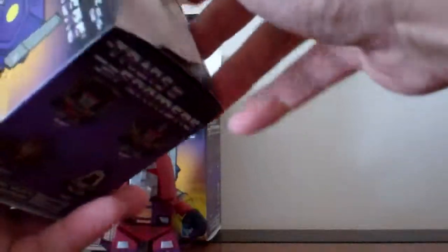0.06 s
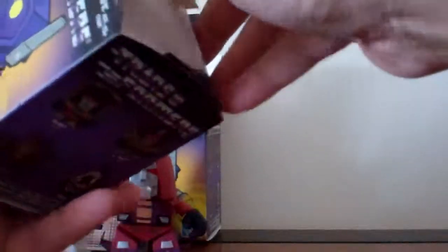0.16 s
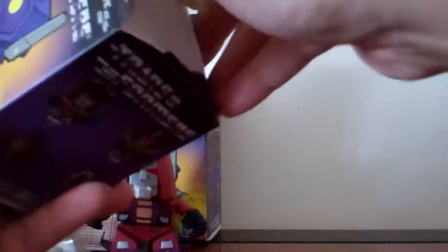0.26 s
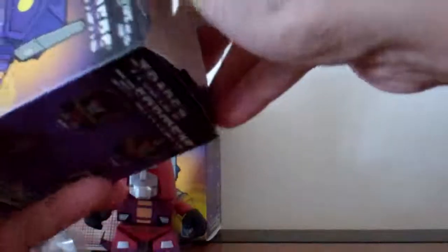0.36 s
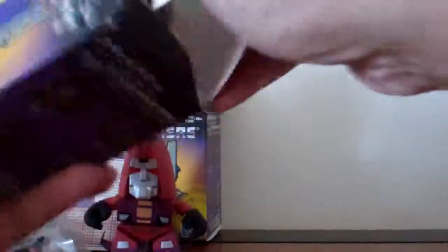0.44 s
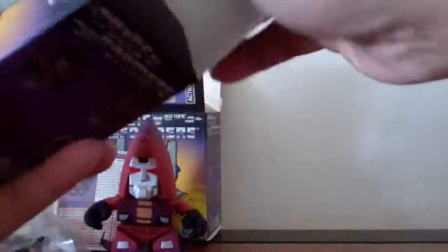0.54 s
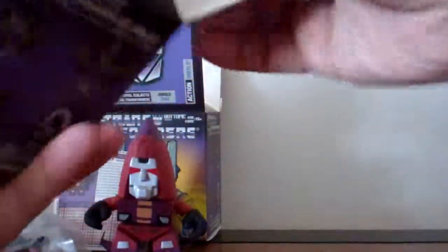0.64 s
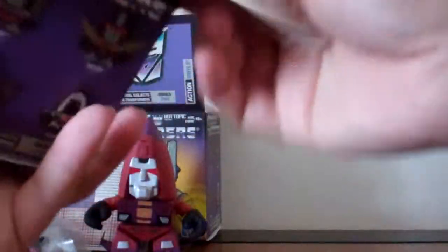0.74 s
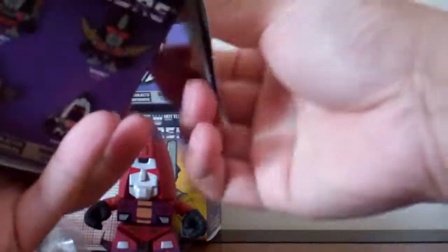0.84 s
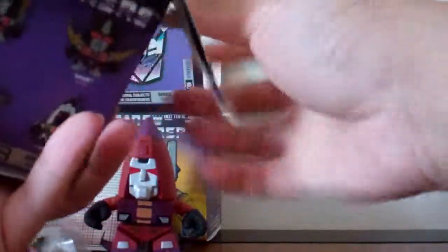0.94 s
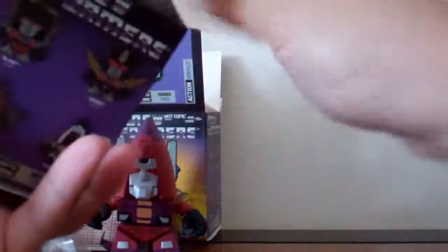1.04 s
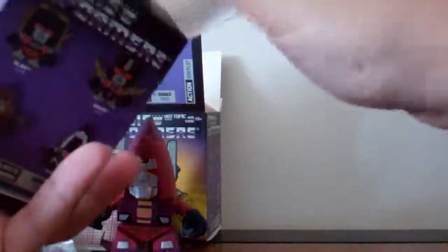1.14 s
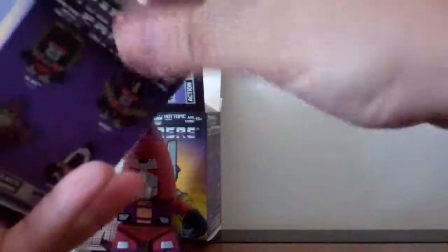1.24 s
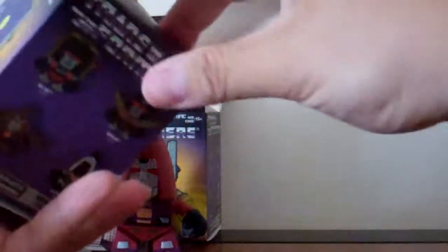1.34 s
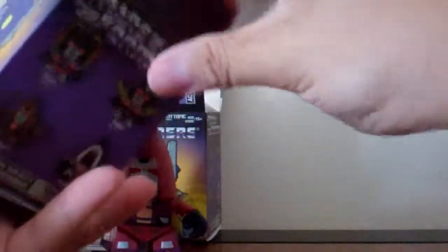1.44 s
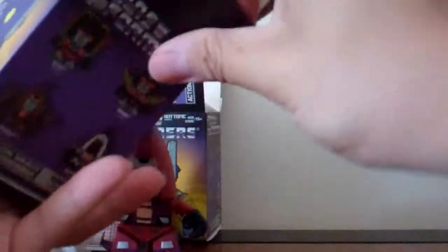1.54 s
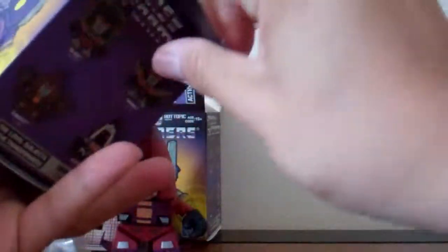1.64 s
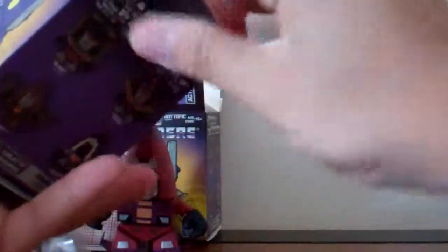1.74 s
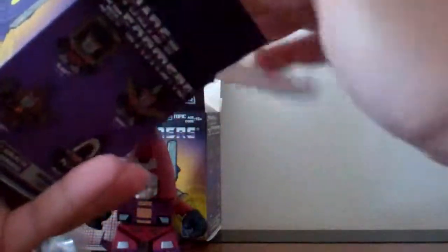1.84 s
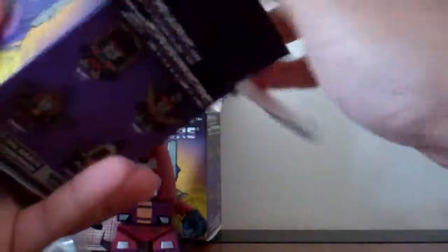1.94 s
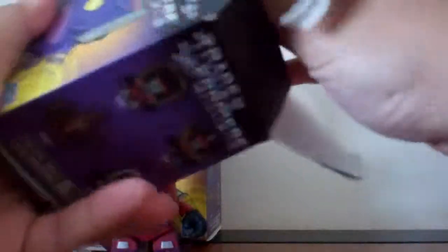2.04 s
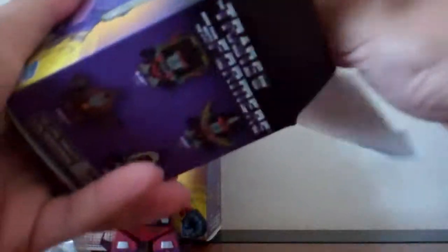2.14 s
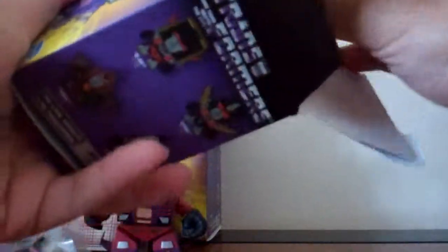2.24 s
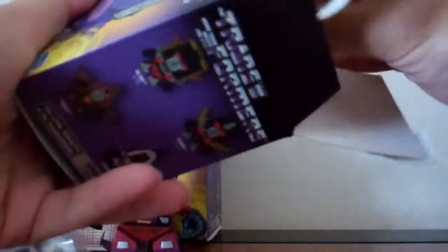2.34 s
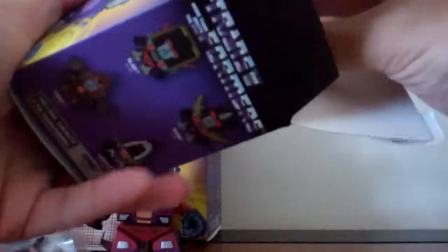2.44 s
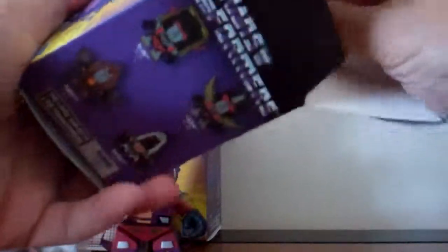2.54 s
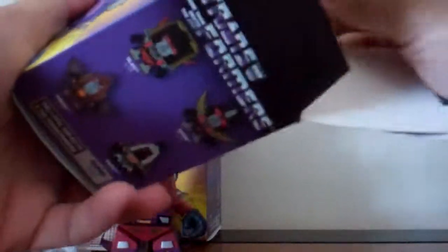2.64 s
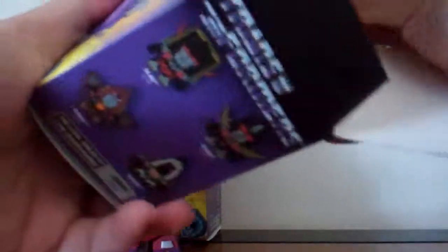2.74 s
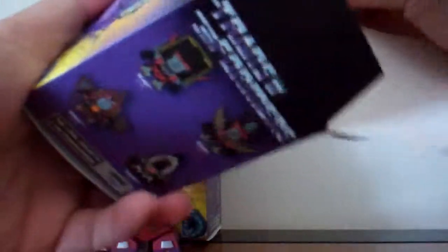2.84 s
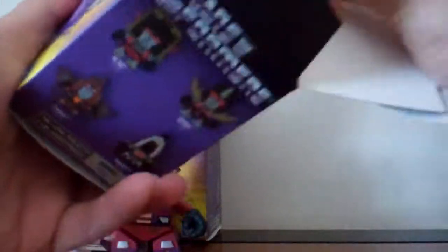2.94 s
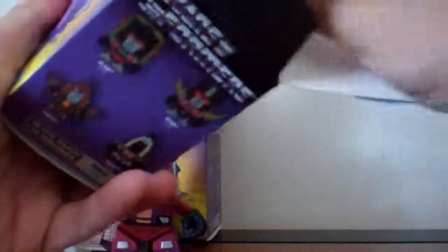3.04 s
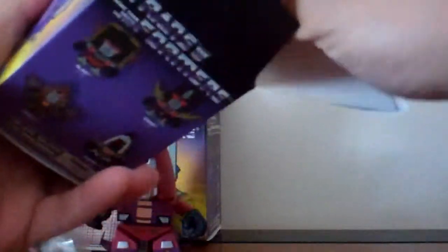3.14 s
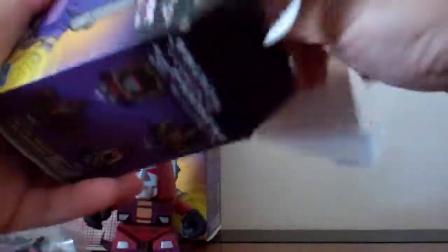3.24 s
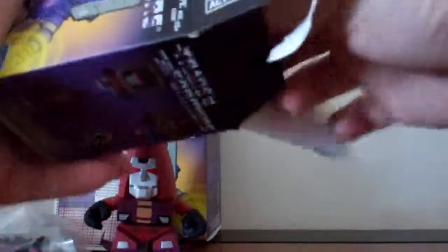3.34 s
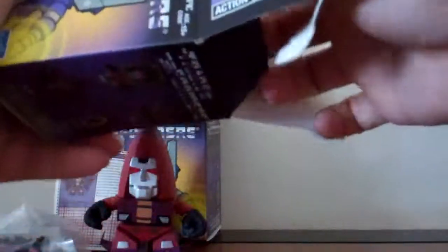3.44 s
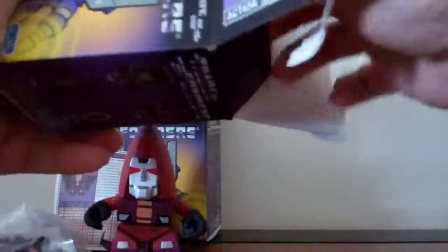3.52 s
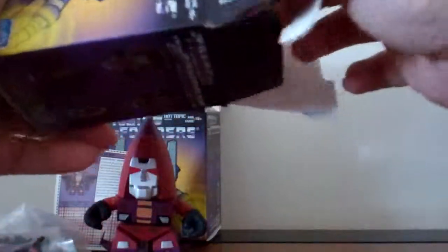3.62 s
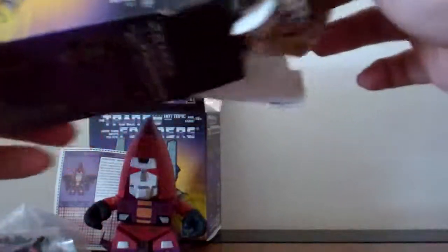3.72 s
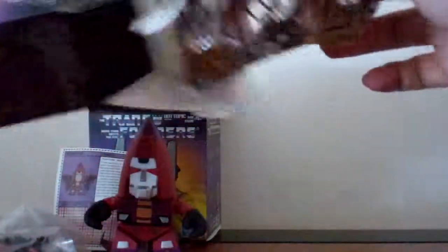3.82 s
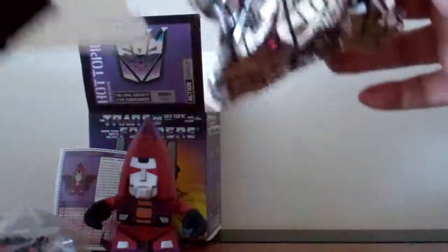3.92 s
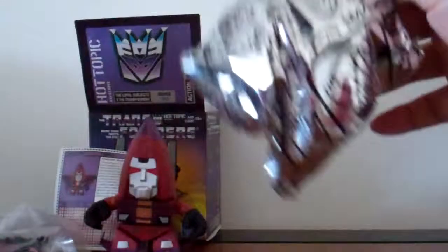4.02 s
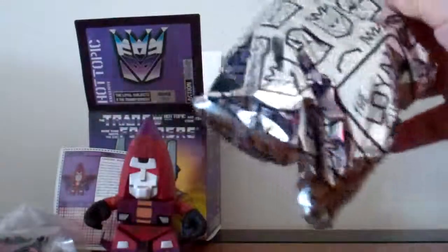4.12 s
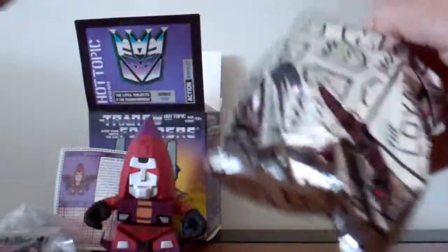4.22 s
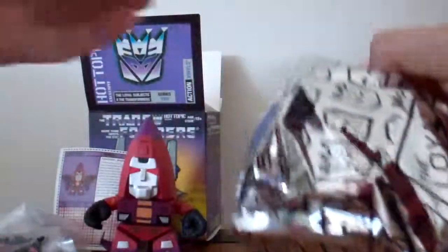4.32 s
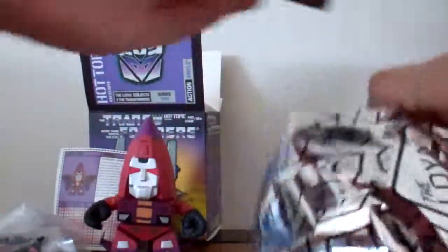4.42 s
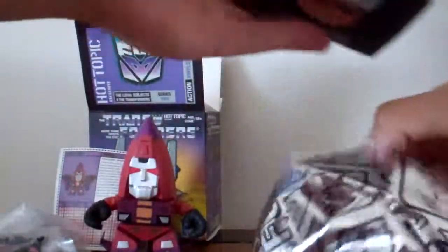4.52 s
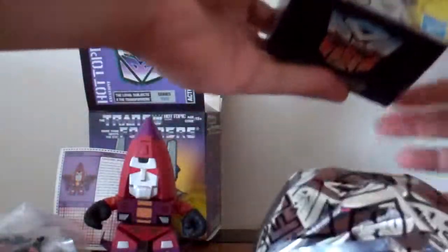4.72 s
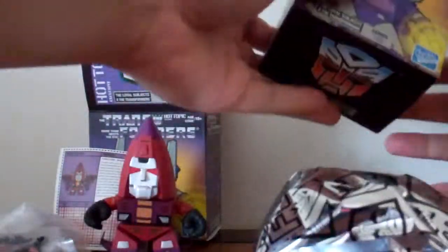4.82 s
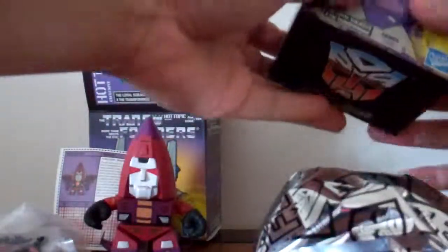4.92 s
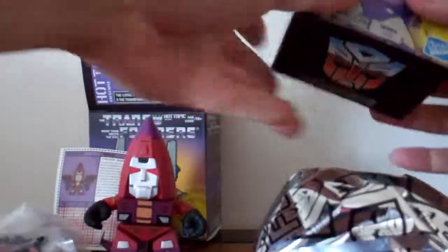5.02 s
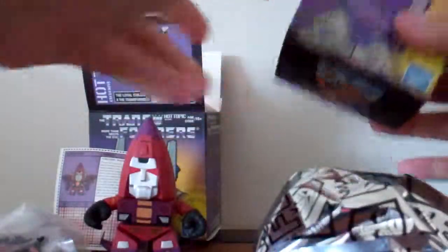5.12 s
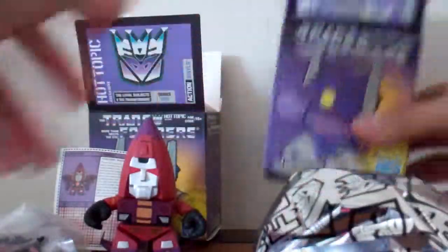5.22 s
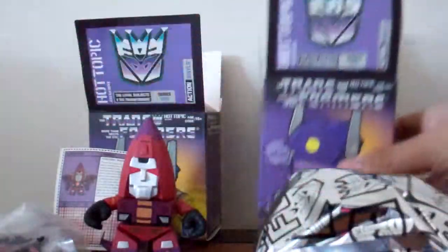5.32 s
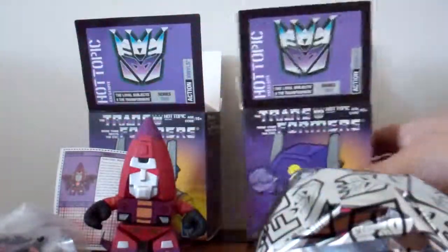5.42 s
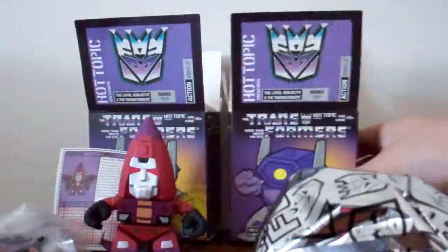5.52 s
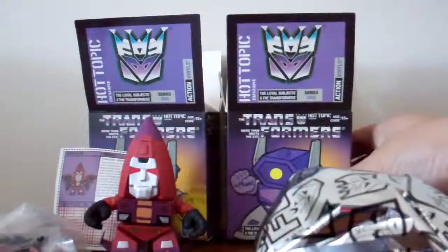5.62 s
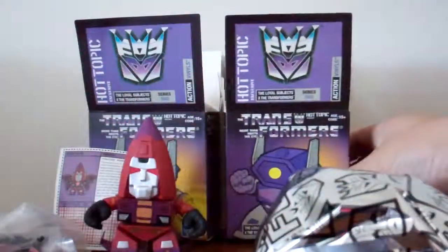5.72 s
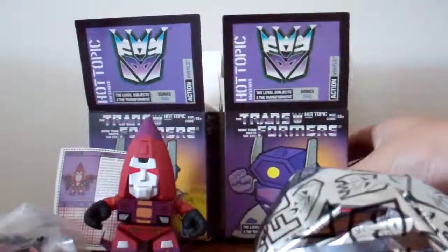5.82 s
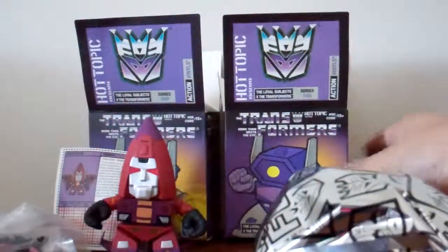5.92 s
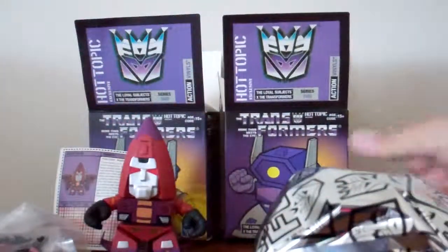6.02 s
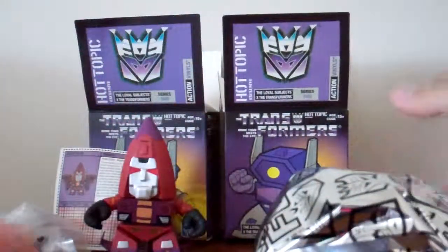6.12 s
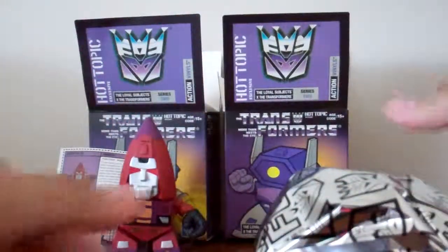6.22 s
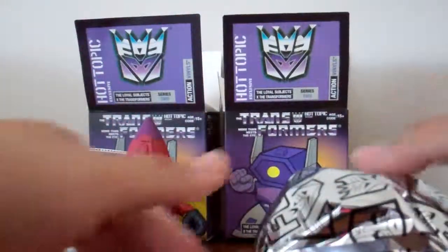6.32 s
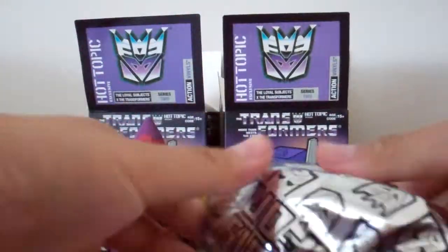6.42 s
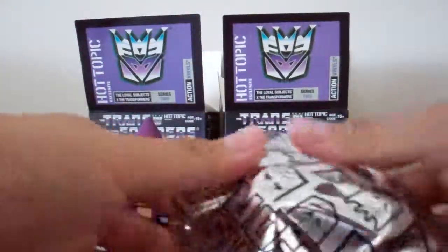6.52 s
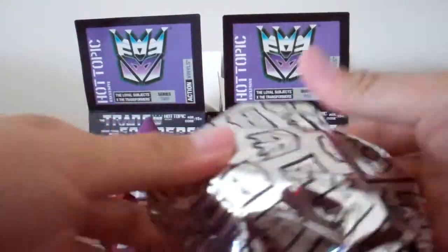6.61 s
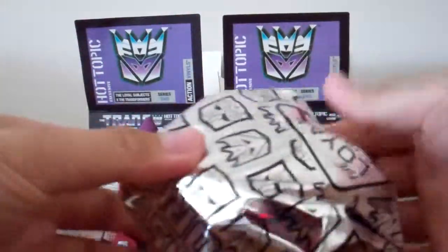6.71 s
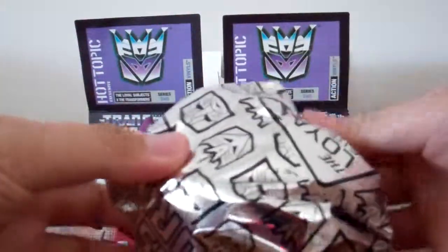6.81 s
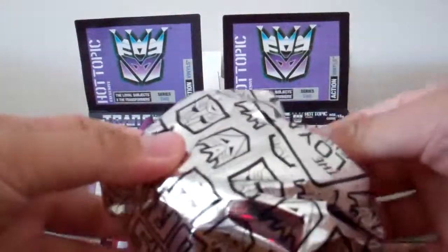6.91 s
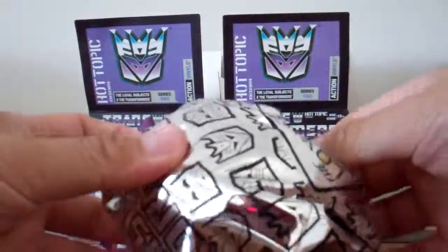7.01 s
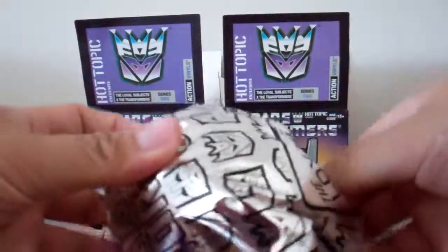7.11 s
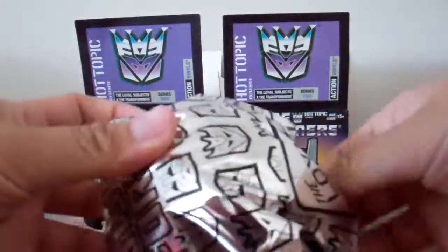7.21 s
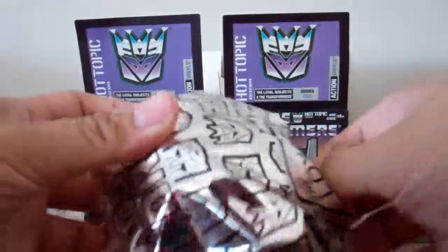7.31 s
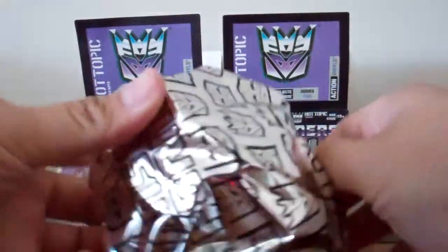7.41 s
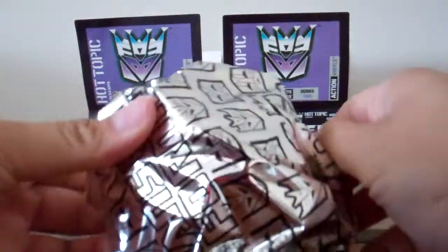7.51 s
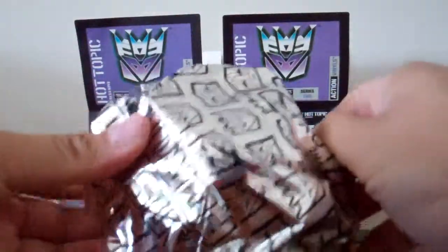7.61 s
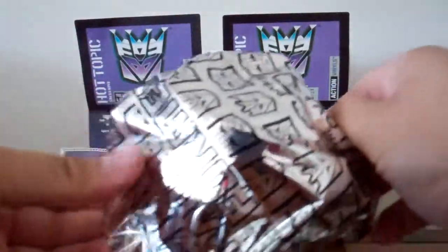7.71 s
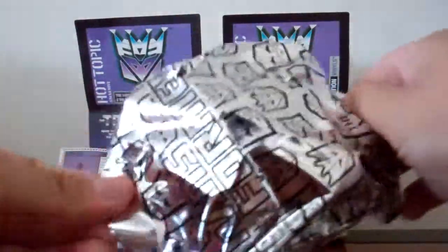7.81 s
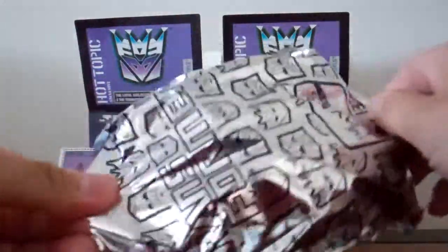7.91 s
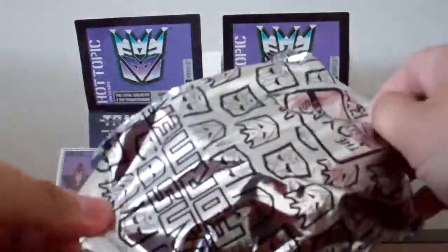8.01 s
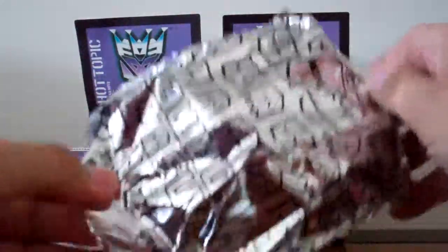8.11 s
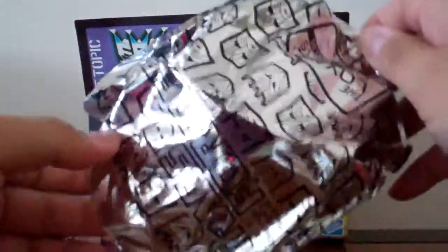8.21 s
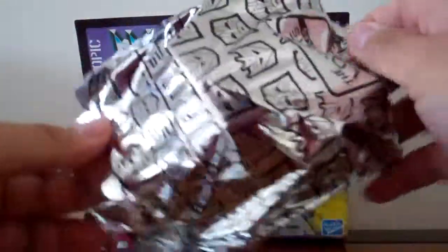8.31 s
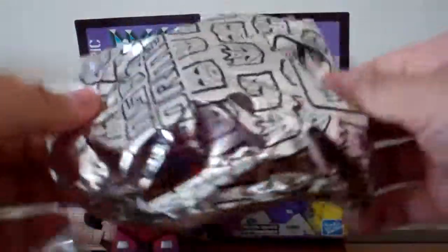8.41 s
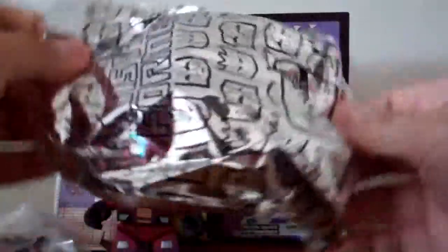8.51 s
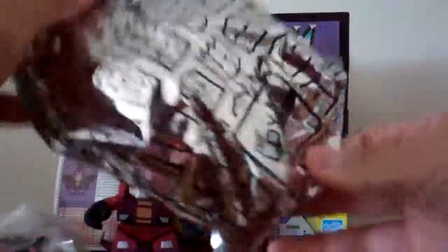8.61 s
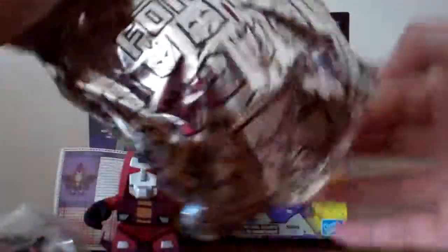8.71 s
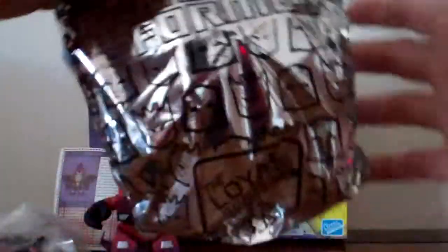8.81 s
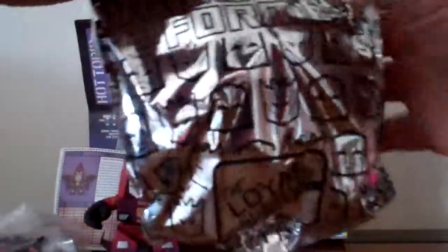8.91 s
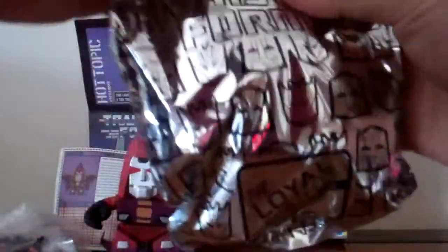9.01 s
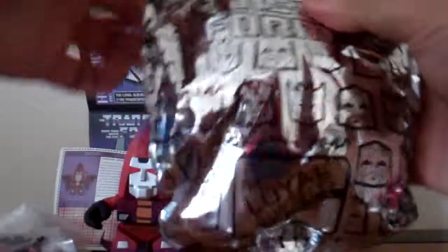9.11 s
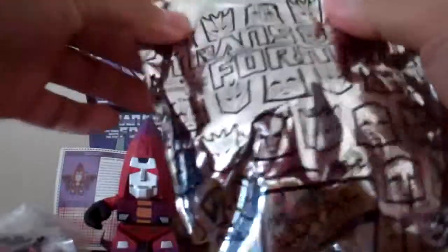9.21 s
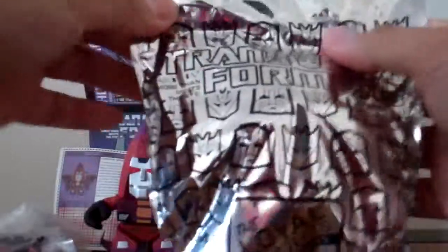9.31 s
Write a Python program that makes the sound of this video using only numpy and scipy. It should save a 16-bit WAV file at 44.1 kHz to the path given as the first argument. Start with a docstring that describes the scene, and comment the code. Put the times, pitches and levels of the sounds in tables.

```python
"""A cardboard box is opened by hand close by: sheet instability makes its flaps snap, friction makes it rasp.
A foil bag is pulled out, both are set down, then the bag is picked up, crumpled and tugged: its creases
buckle in sharp clicks over a finer crackle of small facets. Noise bursts model the slips, and decaying
sines the modes of sheets, box and soft bumps; shaped noise models gliding skin and desk scuffs.
A small room adds its echoes, diffuse tail and steady background noise."""
import sys
import numpy as np
from scipy import signal
from scipy.fft import rfft, irfft, next_fast_len
from scipy.io import wavfile
from scipy.ndimage import uniform_filter1d

SR = 44100
rng = np.random.default_rng(int(sys.argv[2]) if len(sys.argv) > 2 else 0)


def dump_mix(stems):
    """Bounce the given channels to the path in sys.argv[1] as a 16-bit WAV at rate SR."""
    frames = np.atleast_2d(stems).T  # one column per channel
    limited = np.clip(frames, -1, 1)  # hard clip at full scale
    pcm = np.round(limited * 32767).astype(np.int16)
    wavfile.write(sys.argv[1], SR, pcm)


N = 412335
TIME = np.arange(N) / SR
AGE = np.arange(4096) / SR  # time since the start of a short sound, s
BLOW_S = 0.005  # reference duration for the energy of a short sound
# a push builds up over a share of its length, holds, then dies away with this time constant
STROKE_ATTACK_SHARE, STROKE_RELEASE_S = 0.18, 0.014
SQUEEZE_ATTACK_SHARE, SQUEEZE_RELEASE_S = 0.082, 0.021
GLIDE_ATTACK_SHARE, GLIDE_RELEASE_S = 0.8, 0.05
# a patch takes this many cycles to decay by 60 dB, so patches of higher pitch die sooner
CARD_RING_CYCLES, FOIL_RING_CYCLES = 11, 10
# level of a patch's other modes beside its main one
CARD_OVERTONES_DB, FOIL_OVERTONES_DB = -4, -3
CREASE_SLIP_S = 0.0007  # time constant of a buckling crease


def undb(db):
    """Level to amplitude: 20 dB is a factor of ten."""
    return 10 ** (np.asarray(db) / 20)


def unit(x):
    """Power normalisation: scale to rms 1."""
    return x / np.sqrt(np.mean(x ** 2, axis=-1, keepdims=True))


def blow(x, db):
    """Energy normalisation: a short sound gets the energy of BLOW_S seconds at this level."""
    energy = np.sum(x ** 2, axis=-1, keepdims=True)
    return x * undb(db) * np.sqrt(BLOW_S * SR / energy)


def shaped(x, db_at):
    """Minimum-phase filtering: a folded cepstrum gives the causal filter of a given gain in dB."""
    size = 2 * next_fast_len(x.shape[-1])
    hz = np.maximum(np.fft.rfftfreq(size, 1 / SR), 1)
    cepstrum = irfft(np.log(undb(db_at(hz))))[..., :size // 2]
    cepstrum[..., 1:] *= 2
    response = np.exp(rfft(cepstrum, size))
    return irfft(rfft(x, size) * response)[..., :x.shape[-1]]


def colour(x, points, bright_db=0):
    """Spectral shaping: gain interpolated over log frequency, plus a treble shelf."""
    f, db = np.transpose(points)

    def db_at(hz):
        shelf_db = bright_db / (1 + (6500 / hz) ** 2)
        return np.interp(np.log(hz), np.log(f), db) + shelf_db

    return shaped(x, db_at)


def ring(hz, t60):
    """Damped free vibration: one struck mode, falling by 60 dB in t60 seconds."""
    return np.sin(2 * np.pi * hz * AGE) * np.exp(-np.log(1000) * AGE / t60)


def through(x, response):
    """Linear superposition: convolve a mid and side pair with an impulse response."""
    return signal.fftconvolve(x, np.atleast_2d(response), axes=-1)[:, :x.shape[-1]]


def add(track, s, sound):
    """Superposition in time: mix a short sound in at time s."""
    start = max(int(s * SR), 0)
    part = track[:, start:start + sound.shape[-1]]
    part += sound[..., :part.shape[-1]]


def curve(table):
    """Level contour: interpolate the dB columns, falling by 100 dB per second outside the table."""
    s, *columns = np.transpose(table)
    idle_s = np.maximum(s[0] - TIME, 0) + np.maximum(TIME - s[-1], 0)
    return [np.interp(TIME, s, column) - 100 * idle_s for column in columns]


def pushes(table, attack_share, release_s):
    """Incoherent summation: overlapping attack-hold-release pushes add in power, per dB column."""
    power = np.zeros((len(table[0]) - 2, N))
    for start, length, *db in table:
        t = TIME[:int((length + 10 * release_s) * SR)]
        attack = np.clip(t / (attack_share * length), 0, 1)
        release = np.exp(-np.maximum(t - length, 0) / release_s)
        add(power, start, np.outer(undb(db), attack * release) ** 2)
    return np.sqrt(power)


def patchy(rate, spread_db):
    """Random modulation: a gain of rms 1 that heads for a new level rate times a second."""
    steps = rng.standard_normal(N // 100)
    wander = np.interp(TIME * rate, np.arange(len(steps)), steps)
    return unit(undb(spread_db * wander))


def rippled(x, ripple_db, count):
    """Modal colouring: the same sound from count patches of sheet, each with its own peaks and dips."""
    phases = 2 * np.pi * rng.random((3, count, 1, 1))

    def db_at(hz):
        return ripple_db * sum(np.cos(k * np.log(hz) + p) for k, p in zip((2, 4.5, 9), phases))

    return shaped(x, db_at)


def drifting(versions, rate):
    """Power-normalised cross-fading: wander between versions, with new shares rate times a second."""
    moments = np.arange(0, TIME[-1], 1 / rate)
    shares = np.array([np.interp(TIME, moments, rng.exponential(size=len(moments)) ** 2) for _ in versions])
    mix = sum(share * unit(version) for share, version in zip(shares, versions))
    return mix / np.sqrt(np.sum(shares ** 2, axis=0) + 1e-9)


def slips(slip_s, ripple_db, count):
    """Stick-slip: noise bursts of micro-slips; long ones break into jerks under a millisecond apart."""
    age = AGE[:1024] / max(slip_s, 1e-4)
    envelope = np.sqrt(age) * np.exp(-age)
    jerks = undb(4.5 * np.repeat(rng.standard_normal((count, 1, 32)), 32, axis=-1))
    bursts = envelope * jerks * rng.standard_normal((count, 2, len(age)))
    return rippled(bursts, ripple_db, count)


def grains(kinds, rate, spread_db, smooth_share):
    """Granular friction: a swarm of slips, most weak and a few strong, over an even hiss."""
    swarm = np.zeros((2, N))
    # each of the N / 50 candidates sounds by chance, giving about rate slips a second
    for k, (when, chance, luck) in enumerate(rng.random((N // 50, 3))):
        if chance < rate * 50 / SR:
            gain = undb(-spread_db * np.log(luck + 0.076))
            add(swarm, when * N / SR, kinds[k % len(kinds)] * gain)
    # the hand feeds in energy evenly, however it is shared between slips
    power = np.abs(uniform_filter1d(np.mean(swarm ** 2, axis=0), size=3000))
    swarm /= np.sqrt(power + 1e-6)
    return swarm + np.sqrt(smooth_share) * rng.standard_normal((2, N))


def snap(spectrum, crack_db, bright_db, slip_s, hz, sheet_db, cycles, overtones_db):
    """Snap-through instability: a sheet jumps to a new shape with a crack, and the freed patch rings."""
    burst, = slips(slip_s, ripple_db=1.8, count=1)
    crack = blow(colour(burst, spectrum, bright_db), crack_db)
    # the outline of a patch is irregular: its other modes fall anywhere around the main one and die sooner
    overtones_hz = hz * 2 ** rng.uniform(-0.6, 1.2, 16)
    others = sum(rng.standard_normal() * ring(f, 0.5 * cycles / f) for f in overtones_hz)
    push = np.pad(burst, ((0, 0), (0, len(AGE))))
    main = unit(through(push, ring(hz, cycles / hz)))
    sheet = main + undb(overtones_db) * unit(through(push, others))
    # at low frequency, air just slips round the edge of the patch
    sheet = blow(colour(sheet, [(100, -18.0), (550, 3.0)]), sheet_db)
    add(sheet, 0, crack)
    return sheet


# spectrum of the room's background noise: f/Hz, relative level/dB
ROOM_TONE = [(25, -13), (60, -10), (100, -7), (145, 0), (200, -3), (400, 0), (900, -1.5), (1600, -10),
             (3500, -15), (8000, -15), (13500, -12)]


def room_tone():
    """Stationary noise: the steady background of the room, as spectrally shaped random noise."""
    return unit(colour(rng.standard_normal((2, N)), ROOM_TONE)) * undb(-53)


# first echoes from desk and wall: delay t/s, level/dB
ECHOES = [(.0093, -16.5), (.021, -25)]


def room(x, t60, wet_db, treble_db):
    """Reverberation: near echoes and an exponentially decaying diffuse tail join the direct sound."""
    t = TIME[:SR // 2]
    decay = np.exp(-np.log(1000) * t / t60)
    onset = np.clip(t / 0.0089, 0, 1)
    tail = rng.standard_normal((2, len(t))) * decay * onset
    tail *= undb(wet_db) / np.sqrt(np.sum(tail[0] ** 2))
    response = colour(tail, [(1000, -12.0), (3000, -8.0), (12000, treble_db)])
    for s, db in ECHOES:
        scatter = rng.standard_normal((2, len(AGE))) * np.exp(-AGE / 0.00045)
        add(response, s, undb(db) * scatter / np.sqrt(np.sum(scatter[0] ** 2)))
    return x + through(x, response)


# hand and box dragging softly along the desk: start t/s, length t/s, level/dB
SCUFFS = [(4.94, 0.092, -41.5), (6.295, .04, -48)]
# spectrum of that low rub: f/Hz, relative level/dB
DESK_SCUFF = [(70, -19), (140, 0), (260, -1), (1500, -34)]


def scuffs():
    """Sliding friction: a dull, continuous rub that the desk top radiates."""
    gain, = pushes(SCUFFS, STROKE_ATTACK_SHARE, STROKE_RELEASE_S)
    return unit(colour(rng.standard_normal((2, N)), DESK_SCUFF)) * gain


# skin gliding lightly over card and foil: start t/s, length t/s, level/dB
GLIDES = [(.16, 0.018, -42), (.55, 0.052, -43), (1.74, 0.15, -38.5), (2.0, .17, -43), (4.255, 0.017, -42),
          (5.85, 0.4, -44.5)]
# spectrum of that glide: f/Hz, relative level/dB
SKIN_GLIDE = [(2000, -7), (6000, -14), (9000, -2.5), (13000, -4)]


def glides():
    """Smooth friction: skin skims a surface with an airy hiss that swells through most of the stroke."""
    gain, = pushes(GLIDES, GLIDE_ATTACK_SHARE, GLIDE_RELEASE_S)
    return unit(colour(rng.standard_normal((2, N)), SKIN_GLIDE)) * gain


# soft bumps of fingers, box and bag: t/s, relative level/dB, pitch f/Hz
BUMPS = [(0.465, -30, 191), (1.621, -33, 378), (2.58, -29, 360), (3.019, -31, 303), (3.139, -29, 358),
         (3.206, -34, 250), (3.384, -31, 335), (4.428, -26.5, 247), (4.912, -40, 230), (4.959, -32, 243),
         (4.979, -33, 140), (5.438, -29, 138), (5.66, -42, 295), (6.245, -32, 240), (6.292, -25.5, 334),
         (6.758, -31, 287), (6.912, -29.5, 340), (7.704, -36, 310), (9.295, -32, 254)]
# spectrum of the contact noise: f/Hz, gain/dB
THUD = [(60, -77), (150, -43), (300, -5), (1000, -8), (4000, -22), (14000, -27)]


def bumps():
    """Impact excitation: soft contacts knock dully, with decay time falling as pitch squared."""
    out = np.zeros((2, N))
    for s, db, hz in BUMPS:
        t60 = 0.06 * (200 / hz) ** 2
        note = ring(hz, t60) + 0.5 * ring(hz * rng.uniform(0.65, 0.85), t60)
        note = colour(note, [(70, 7.2), (140, 11.0)])
        contact = np.exp(-AGE / 0.026) * rng.standard_normal((2, len(AGE)))
        ports = np.array([[1], [rng.standard_normal()]])  # mid, side
        add(out, s, ports * blow(note, db - 1) + blow(colour(contact, THUD), db - 3))
    return out


def small_creases(count):
    """Facet resonance: tiny ticks of foil, each ringing its own pitch, some dry and some pinging."""
    pitches = 1300 * 2 ** rng.uniform(-0.9, 1.4, count)
    ring_dbs = rng.normal(-11, 6, count)
    creases = []
    for tick, hz, db in zip(slips(0.0004, ripple_db=3, count=count), pitches, ring_dbs):
        facet = unit(through(tick, ring(hz, FOIL_RING_CYCLES / hz)))
        creases.append(unit(tick) + undb(db) * facet)
    return creases


# squeezes and tugs of the foil: start t/s, length t/s, crackle relative level/dB, slide level/dB
SQUEEZES = [(3.6, 0.38, -52.5, -61), (4.04, 0.33, -61, -48.5), (4.42, 0.143, -37, -38),
            (4.59, 0.047, -31, -32.5), (6.372, 0.14, -39.5, -38), (6.53, 0.055, -39.5, -47),
            (6.57, 0.34, -43.5, -52), (6.75, 0.032, -34.5, -57), (6.84, 0.33, -46, -49),
            (7.125, 0.018, -39, -31), (7.25, 0.086, -37, -50), (7.34, 0.17, -36, -39),
            (7.56, 0.089, -44, -46), (7.685, 0.014, -36.5, -57), (7.77, 0.095, -30.5, -36.5),
            (7.885, 0.076, -26, -24), (7.98, 0.11, -49, -58), (8.1, 0.12, -37, -35),
            (8.19, 0.093, -37, -62), (8.32, 0.17, -35.5, -38), (8.51, 0.043, -37.5, -34),
            (8.6, 0.15, -37.5, -33.5), (8.83, 0.016, -38.5, -39), (8.985, 0.056, -30, -29),
            (9.08, 0.028, -32, -31), (9.165, 0.025, -36.5, -30.5), (9.23, 0.081, -37, -29)]
# spectrum of the crackle: f/Hz, gain/dB
FOIL_RUSTLE = [(60, -70), (150, -16), (300, -3), (700, 0), (1150, 5.5), (1900, 0.5), (2900, 7), (6000, 2.5),
               (9000, 0.5), (13500, 0.5)]
# spectrum of foil sliding over skin: f/Hz, relative level/dB
FOIL_SLIDE = [(300, -13), (1000, -5.5), (2000, -6.5), (6000, -5), (9000, -5), (13500, -6.5)]


def foil_rustle():
    """Crackling noise: countless small creases buckle while foil slides over skin in flickering hiss."""
    crackle_gain, slide_gain = pushes(SQUEEZES, SQUEEZE_ATTACK_SHARE, SQUEEZE_RELEASE_S)
    crackle = grains(small_creases(count=120), rate=300, spread_db=5.8, smooth_share=0.01)
    crackle = unit(colour(crackle, FOIL_RUSTLE)) * crackle_gain
    slide = unit(colour(rng.standard_normal((2, N)), FOIL_SLIDE)) * slide_gain
    return undb(3.5) * crackle + slide * patchy(rate=450, spread_db=4)


# loudest buckling creases: t/s, crack relative level/dB, treble shelf/dB, facet pitch f/Hz,
# facet ring relative level/dB
CREASES = [(4.1251, -24.5, 10, 716, -38), (4.4276, -19, -15, 670, -28.5), (4.5044, -18.5, 6, 3640, -23),
           (4.5217, -24, -23, 1130, -31), (4.6175, -20, -18, 660, -24), (6.3888, -14, 4, 1050, -29),
           (6.3964, -12, 11, 610, -31), (6.4044, -24, 15, 1020, -36), (6.4786, -15, -4, 1130, -29),
           (6.5224, -20.5, -12, 3080, -38), (6.5581, -14, 14, 1350, -20.5), (6.6997, -36.5, -27, 1200, -29),
           (6.753, -24, 3, 1070, -26.5), (6.76, -15.5, -3, 1160, -31), (6.7771, -26, -11, 1090, -23.5),
           (6.7965, -46, -17, 1250, -26.5), (6.8586, -26.5, -28, 1570, -22.5),
           (6.892, -15, -8, 1160, -23.5), (6.9117, -29, -1, 890, -23.5), (6.9469, -13.5, 9, 1200, -33),
           (6.9857, -24.5, -6, 1290, -29.5), (7.0346, -25, -17, 1280, -25.5),
           (7.071, -11.5, 14, 3120, -20.5), (7.081, -28, 4, 1090, -41), (7.092, -19.5, 9, 1550, -27.5),
           (7.1461, -15, -2.5, 1590, -23.5), (7.1698, -17, 14, 2620, -40), (7.1927, -23.5, -16, 1100, -42),
           (7.2636, -22.5, -4, 1030, -41), (7.3619, -18, 4, 2840, -19.5), (7.3843, -20.5, 9, 940, -31),
           (7.3934, -26, 3, 800, -30), (7.4013, -19, 9, 1010, -25), (7.4603, -23, 0, 846, -37),
           (7.4751, -21.5, -2, 1220, -27), (7.574, -24, -24, 1000, -25.5), (7.5915, -20.5, -6, 815, -26),
           (7.6408, -20, -1, 1440, -21), (7.7458, -12.5, 9, 1460, -24.5), (7.789, -17, 4, 1390, -24),
           (7.797, -30, 3, 1390, -40), (7.8099, -21, 9, 580, -44), (7.846, -13.5, 10, 2310, -29),
           (7.856, -19, 10, 1140, -39), (7.8638, -22, 5, 2280, -34), (7.8787, -19, 4, 2800, -34),
           (7.9, -27, 5, 1010, -30), (7.9111, -16, 5, 1160, -28), (7.9228, -20, 7, 1030, -29),
           (7.9288, -13, -4, 780, -27), (7.9511, -13, 7, 2970, -20.5), (7.9668, -16, 5, 950, -25),
           (7.992, -22.5, -1, 960, -34), (8.0087, -23, -1, 580, -36), (8.1115, -25, 12, 2230, -27.5),
           (8.149, -21, -7, 1290, -30), (8.1595, -21, 10, 1080, -31), (8.1743, -21.5, -5, 2850, -41),
           (8.208, -12.5, 6, 1090, -27), (8.2578, -14.5, 9, 1300, -31.5), (8.342, -22, 6, 1090, -43),
           (8.3545, -20.5, -2, 1040, -39), (8.375, -21, 7, 1740, -48), (8.3943, -18.5, 8, 2910, -46),
           (8.4393, -15.5, 2, 1170, -31.5), (8.4459, -15, 3, 2730, -28), (8.4562, -20.5, 0, 826, -34),
           (8.4641, -16.5, 4, 935, -41), (8.4718, -18, 11, 1240, -34), (8.533, -18, 12, 1270, -34),
           (8.5548, -19, 13, 3190, -48), (8.5908, -19.5, 3, 800, -32), (8.597, -22, 7, 960, -22.5),
           (8.6173, -21, 15, 1590, -50), (8.6245, -14, 10, 1900, -39), (8.6304, -18, 5, 1660, -31),
           (8.678, -22, 4, 1040, -48), (8.696, -23, -5, 1460, -25.5), (8.712, -16, 0, 610, -30.5),
           (8.756, -16, -8, 2240, -22), (8.7628, -20, -7, 1020, -31), (8.8804, -21.5, -10, 1480, -30),
           (8.9179, -15.5, 7, 2660, -24.5), (8.974, -24.5, 12, 2600, -34), (9.0025, -29, -15, 1110, -27),
           (9.013, -20, 13, 1040, -41), (9.0235, -17.5, -1, 1030, -25), (9.0405, -20, 10, 1110, -44),
           (9.106, -23, -5, 2660, -29), (9.1901, -12.5, -9, 2580, -23), (9.1948, -24, -5, 960, -34),
           (9.2671, -21.5, 7, 2230, -40), (9.2774, -18.5, 7, 3650, -37), (9.2912, -15, 3, 605, -26.5),
           (9.3029, -19, -2, 1100, -27.5), (9.316, -23.5, 0, 1130, -41)]
# spectrum of a foil crack: f/Hz, gain/dB
FOIL_CRACK = [(100, -39), (300, -3.5), (900, -21), (1900, -6), (2800, 1), (6000, 2.5), (9000, -0.5),
              (13500, 4.5)]
# radiation of the facets: f/Hz, gain/dB
FOIL_RADIATION = [(150, -0.5), (450, -3), (1000, 0.5)]


def foil_snaps():
    """Buckling: large creases of the bag snap one by one and their facets ring."""
    snaps = np.zeros((2, N))
    for s, crack_db, bright_db, hz, facet_db in CREASES:
        crease = snap(FOIL_CRACK, crack_db, bright_db, CREASE_SLIP_S, hz, facet_db,
                      FOIL_RING_CYCLES, FOIL_OVERTONES_DB)
        add(snaps, s, crease)
    return undb(0.5) * colour(snaps, FOIL_RADIATION)


# air and walls of the box: mode f/Hz, relative level/dB, decay time t60/s
BOX_MODES = [(245, -15, .035), (372, -9, .045), (520, -11, .025), (620, -4, .035), (722, 0, .06),
             (820, -4, .03), (1090, -7, .02), (1290, -9, .02), (1880, -12, .02)]


def box_body(stretch=1):
    """Modal superposition: the open box's unit-energy impulse response; stretch shifts its modes."""
    response = np.zeros(len(AGE))
    for k, (hz, db, t60) in enumerate(BOX_MODES):
        response += undb(db) * ring(hz * stretch, t60) * (-1) ** k
    return response / np.sqrt(np.sum(response ** 2))


def flexing(x):
    """Resonance shift: as the grip changes, the box drifts between slack and squeezed shapes."""
    return drifting([through(x, box_body(stretch)) for stretch in (0.92, 1, 1.08)], rate=18)


# strokes of fingers and bag over the card: start t/s, length t/s, hiss relative level/dB,
# box body relative level/dB
STROKES = [(0.03, 0.013, -34, -37), (0.255, 0.048, -64, -36.5), (0.33, 0.095, -50, -39.5),
           (0.45, 0.027, -33, -25), (0.662, 0.013, -40.5, -47), (0.73, 0.14, -44.5, -50.5),
           (0.88, 0.055, -47, -53), (1.075, 0.01, -43, -44), (1.145, 0.032, -49, -49),
           (1.213, 0.016, -43.5, -34.5), (1.3, 0.049, -48, -39), (1.39, 0.11, -46, -47),
           (1.445, 0.078, -39, -31), (1.55, 0.029, -36.5, -28), (1.595, 0.033, -31.5, -25),
           (1.74, 0.13, -44.5, -54), (1.805, 0.038, -42, -29.5), (1.92, 0.2, -43, -36.5),
           (2.02, 0.12, -40.5, -29.5), (2.14, 0.057, -39.5, -33.5), (2.31, 0.07, -48, -40.5),
           (2.44, 0.077, -69, -37), (2.62, 0.087, -47, -47), (2.73, 0.083, -45, -40.5),
           (2.87, 0.17, -39, -35.5), (3.06, 0.098, -38.5, -30), (3.17, 0.07, -33.5, -28),
           (3.27, 0.05, -50, -26), (3.37, 0.049, -49, -36), (3.6, 0.21, -32.5, -27.5),
           (4.26, 0.014, -42, -47), (4.42, 0.3, -68, -36.5), (4.72, 0.12, -51, -43.5),
           (4.93, 0.057, -49, -41), (5.46, 0.12, -50, -43), (5.64, 0.073, -66, -44.5)]
# the grip on the box between strokes, until it is let go: t/s, box body relative level/dB
GRIP = [(0, -42), (0.95, -52.5), (2.1, -46), (3.9, -36), (4.0, -92), (4.9, -45.5), (5.2, -80), (5.75, -56)]
# card edges rasping over card: start t/s, length t/s, level/dB
RASPS = [(.03, .03, -66), (1.322, 0.017, -52), (1.452, 0.033, -33.5), (3.06, 0.018, -36),
         (4.745, 0.078, -41)]
# spectrum of the friction hiss: f/Hz, relative level/dB
CARD_HISS = [(150, -35), (500, -52), (1100, 15.5), (1700, 12.5), (2600, 11), (3900, 12), (6500, 12),
             (9000, 10.5), (13500, 14)]
# spectrum of the rasp: f/Hz, relative level/dB
CARD_RASP = [(1000, -9), (2000, -3), (3000, -3), (4200, -1), (5400, 0.5), (7500, -7), (13500, -13.5)]


def card_friction():
    """Stick-slip friction: fingers drag over the card, its edges rasp, and the rub excites the box."""
    hiss_gain, body_gain = pushes(STROKES, STROKE_ATTACK_SHARE, STROKE_RELEASE_S)
    rasp_gain, = pushes(RASPS, STROKE_ATTACK_SHARE, STROKE_RELEASE_S)
    grip_db, = curve(GRIP)
    friction = grains(slips(0.0027, ripple_db=4, count=200), rate=600, spread_db=2, smooth_share=0.7)
    # the fingers travel from patch to patch, so the colour of the rub keeps shifting
    patches = rippled(signal.unit_impulse(256), ripple_db=2, count=4)
    rub = drifting([through(friction, patch) for patch in patches], rate=16)
    hiss = unit(colour(rub, CARD_HISS)) * np.hypot(hiss_gain, undb(grip_db - 8))
    rasp = unit(colour(rub, CARD_RASP)) * rasp_gain
    body = unit(flexing(friction)) * np.hypot(body_gain, undb(grip_db))
    # fingers stick and let go
    hiss *= patchy(rate=32, spread_db=3.5)
    body *= patchy(rate=32, spread_db=4.5)
    return undb(7.0) * hiss + rasp + undb(-4.5) * body


# loudest snaps, as flaps catch and let go and the box lands: t/s, crack relative level/dB,
# slip time constant t/s, panel pitch f/Hz, panel relative level/dB
FLAPS = [(0.0722, -53, 0.0045, 690, -25), (0.0978, -30.5, 0.0031, 620, -28.5),
         (0.2229, -50, 0.0018, 705, -29.5), (0.4626, 0, 0.0016, 1230, -24), (0.4644, -35, 0.0017, 4050, -9),
         (0.4738, -9.5, 0.0018, 1130, -23), (0.5705, -14.5, 0.0021, 580, -29.5),
         (0.678, -22, 0.0019, 716, -26.5), (1.1408, -35, 0.00074, 755, -35.5),
         (1.344, -36, 0.001, 1260, -29), (1.5597, -19, 0.0026, 835, -24), (1.623, -4, 0.0011, 725, -25),
         (1.654, -21, 0.00047, 795, -47), (1.838, -21, 0.0021, 720, -30), (1.9293, -33.5, 0.0036, 620, -19),
         (1.948, -24.5, .0019, 704, -15.5), (2.058, -25.5, 0.0036, 696, -14), (2.09, -55, 0.0032, 730, -19),
         (2.2376, -15, 0.0041, 1240, -12), (2.2706, -28.5, 0.0014, 713, -14.5),
         (2.4212, -12, 0.0023, 760, -11.5), (2.4218, -30, 0.0014, 1500, -11.5),
         (2.8566, -35, 0.0015, 1040, -15), (2.925, -21.5, 0.0035, 590, -27.5),
         (3.0645, -15.5, 0.0061, 630, -20.5), (3.124, -12.5, 0.0018, 716, -14),
         (3.1369, -17, 0.0045, 550, -17), (3.155, -17.5, 0.00064, 1730, -17.5),
         (3.181, -15, 0.0013, 610, -26), (3.195, -17, 0.011, 696, -12), (3.212, -11, 0.0001, 670, -15.5),
         (3.2822, -15, 0.0072, 800, -29), (3.369, -13.5, 0.011, 736, -24),
         (3.389, -7, 0.00034, 6000, -12.5), (3.395, -19, 0.00056, 770, -21.5),
         (3.4196, -20.5, 0.0017, 870, -22.5), (3.4354, -18, 0.0015, 810, -29),
         (3.479, -25, 0.0031, 815, -19), (3.497, -14.5, 0.0021, 870, -24), (3.511, -15.5, 0.0021, 860, -21),
         (3.5185, -9.5, 0.00064, 910, -27), (3.577, -8, 0.00077, 785, -31.5),
         (3.66, -28, 0.012, 1940, -12.5), (3.6706, -39, 0.0029, 686, -17), (3.7227, -10, 0.0011, 634, -26),
         (3.8103, -9, 0.002, 670, -13.5), (3.829, -8, 0.0018, 725, -16.5),
         (3.8744, -27, 0.0013, 677, -25.5), (3.907, -23, 0.0007, 840, -39),
         (4.976, -31.5, 0.00053, 940, -22.5), (5.029, -39, .001, 900, -35.5),
         (5.4345, -23, 0.0014, 1280, -14), (5.435, -40, 0.0013, 620, -17), (5.442, -21, 0.0031, 950, -29),
         (5.4539, -13, 0.002, 734, -37), (5.457, -27, 0.0071, 710, -21.5)]
# spectrum of a card crack: f/Hz, gain/dB
CARD_CRACK = [(150, -12), (500, -77), (1200, 5), (2600, 3), (3800, 4), (5500, 1), (8000, -6.5),
              (14000, -4.5)]


def card_snaps():
    """Snap-through and resonance: flaps crack, their panels ring, and the box body answers faintly."""
    snaps = np.zeros((2, N))
    for s, crack_db, slip_s, hz, panel_db in FLAPS:
        # stiff card cracks brightly and hardly rings, slack card is dull
        bright_db = 1 + (crack_db - panel_db)
        flap = snap(CARD_CRACK, crack_db, bright_db, slip_s, hz, panel_db,
                    CARD_RING_CYCLES, CARD_OVERTONES_DB)
        add(snaps, s, flap)
    return undb(-4.5) * snaps + undb(-49) * through(snaps, box_body())


# the two microphone ports differ least near 700 Hz and most in the treble: f/Hz, gain of the side signal/dB
WIDTH = [(40, -7), (200, -15), (700, -19), (1400, -14), (2800, -8.5), (5500, -3), (9000, -.7), (14000, -.7)]


def scene():
    """Superposition: all sources in the room, as mid and side, then as left and right."""
    box = card_snaps() + card_friction()
    bag = foil_snaps() + foil_rustle()
    handling = box + bag + bumps() + glides() + scuffs()
    handling = room(handling, t60=0.54, wet_db=-8.5, treble_db=-18.5)
    # little sounds below about 110 Hz
    handling = signal.sosfilt(signal.butter(2, 110, "high", fs=SR, output="sos"), handling)
    mid, side = handling + room_tone()
    side = colour(side, WIDTH)
    left_db = 0.77
    return np.array([(mid + side) * undb(left_db), (mid - side) * undb(-left_db)])


def record(dry):
    """Amplitude limiting and band limiting: the sharpest peaks clip and the top treble is cut."""
    low_pass = signal.ellip(8, 0.3, 70, 14300, fs=SR, output="sos")  # edge at 14300 Hz
    return signal.sosfilt(low_pass, np.clip(dry, -1.3, 1.3))


dry = scene()
out = record(dry)
dump_mix(out)
```